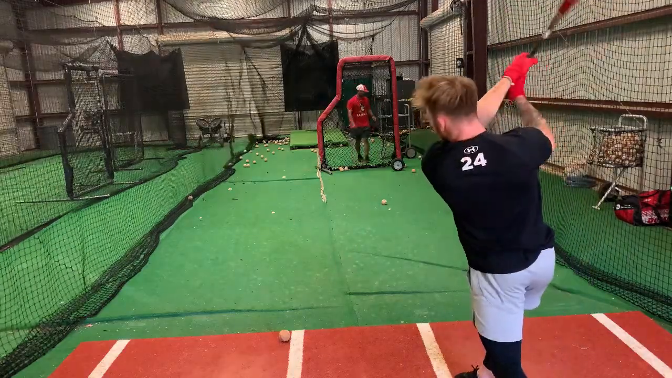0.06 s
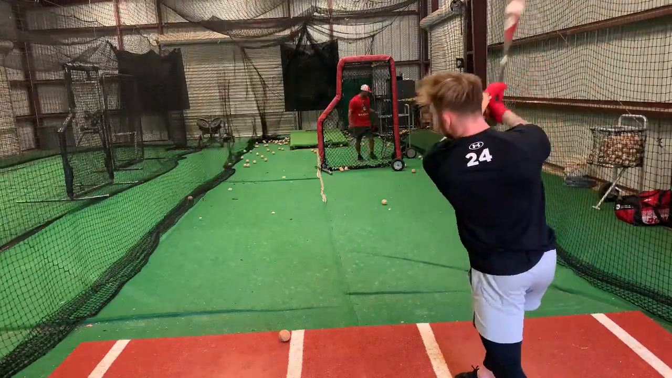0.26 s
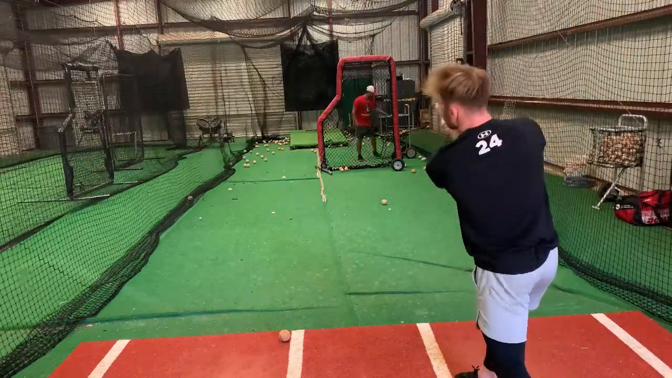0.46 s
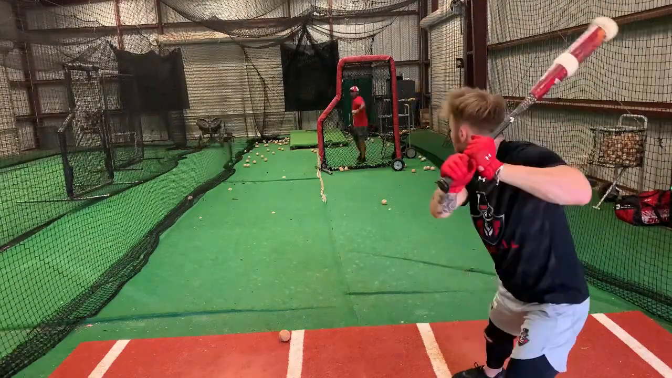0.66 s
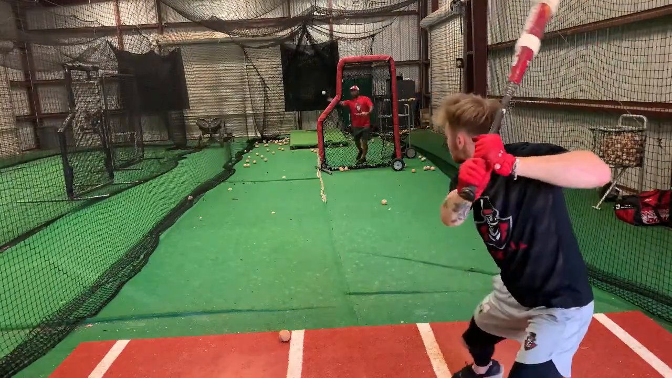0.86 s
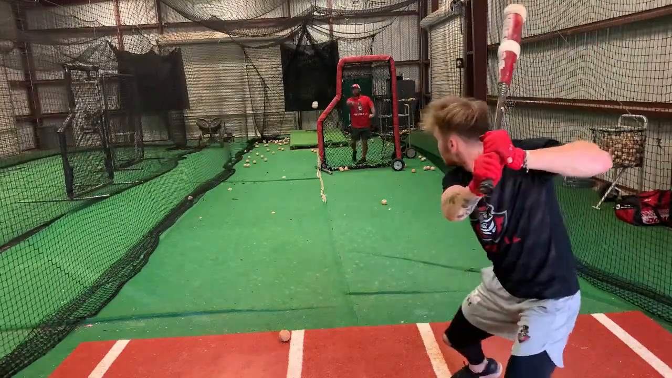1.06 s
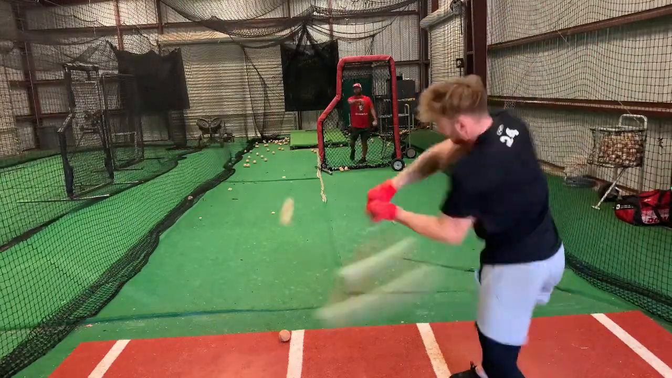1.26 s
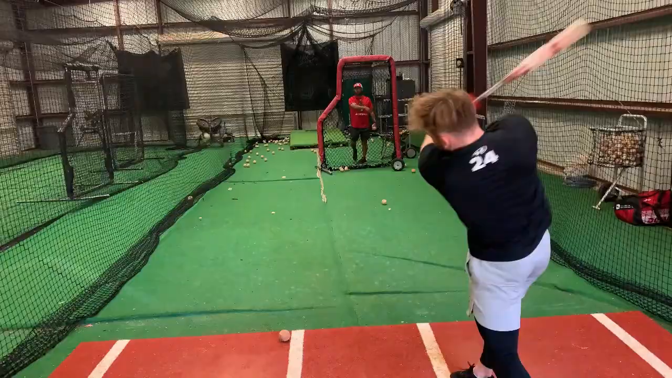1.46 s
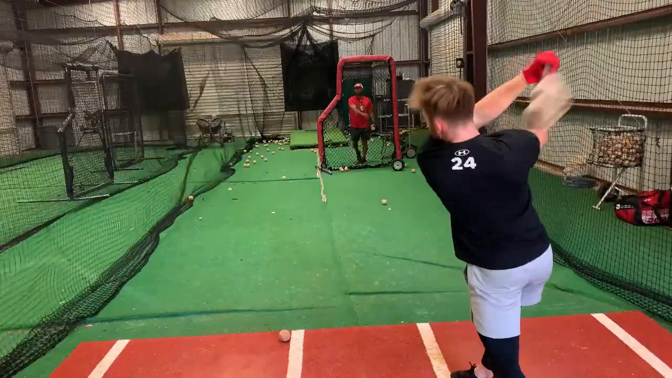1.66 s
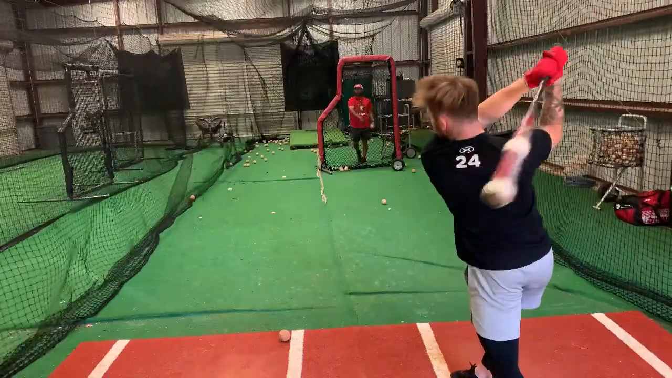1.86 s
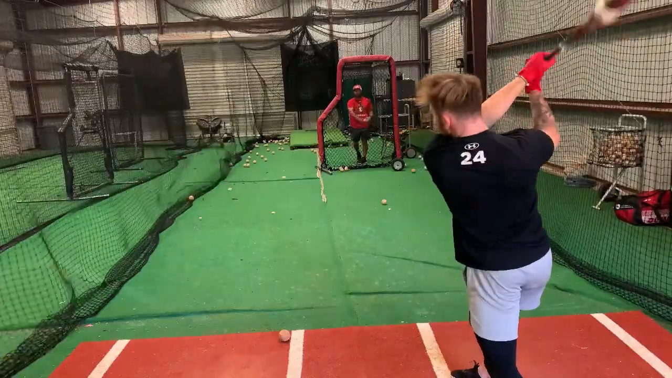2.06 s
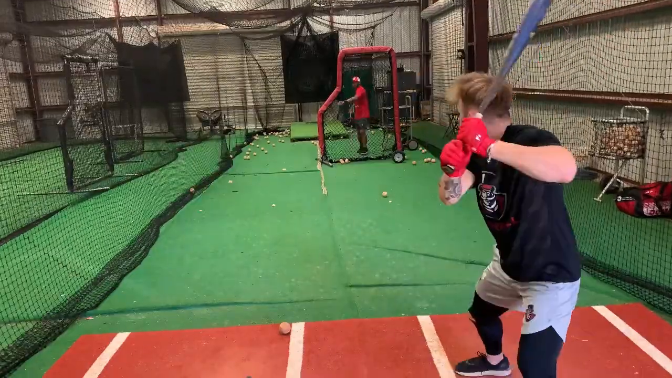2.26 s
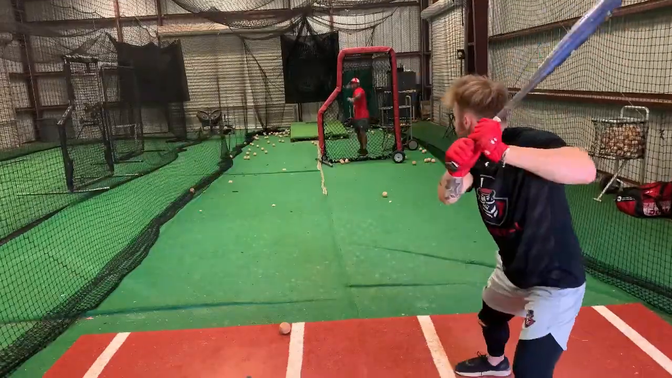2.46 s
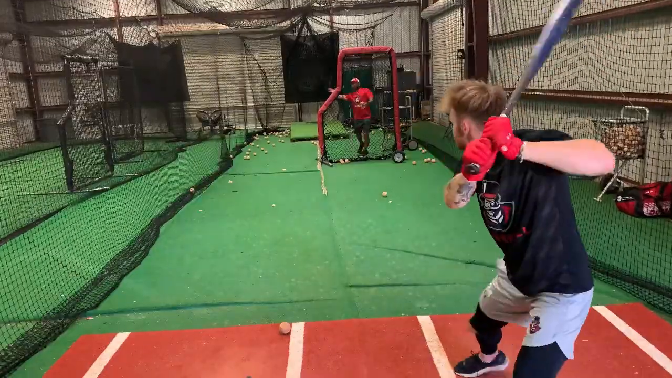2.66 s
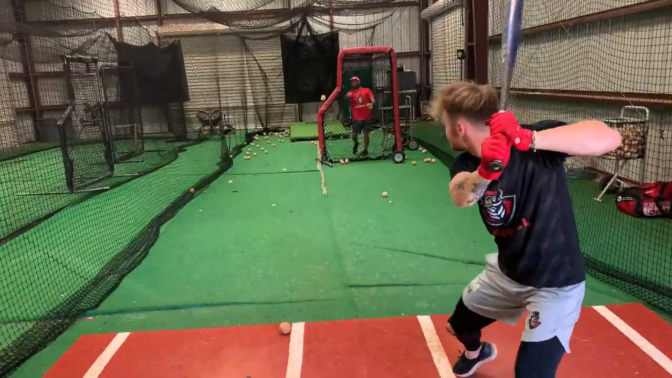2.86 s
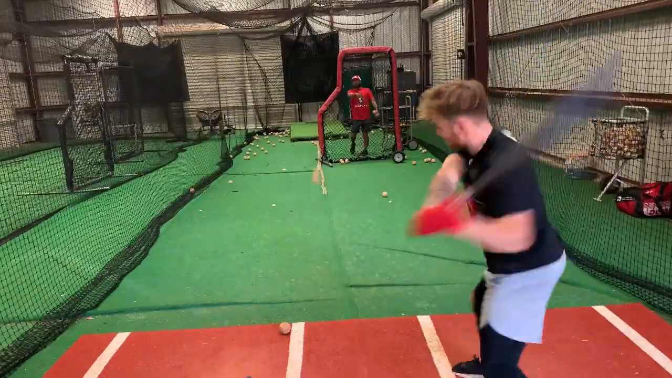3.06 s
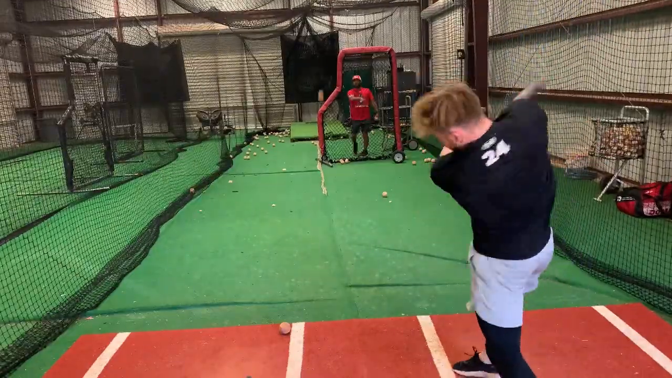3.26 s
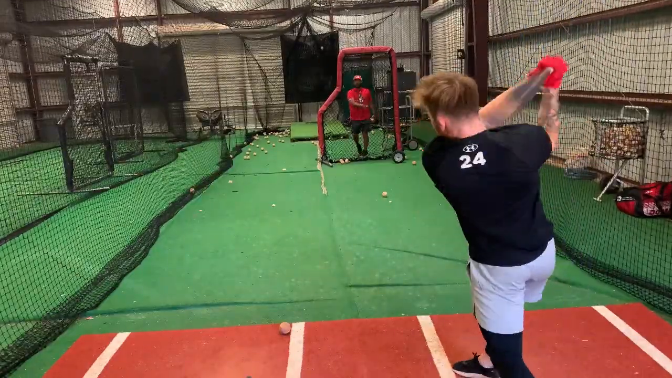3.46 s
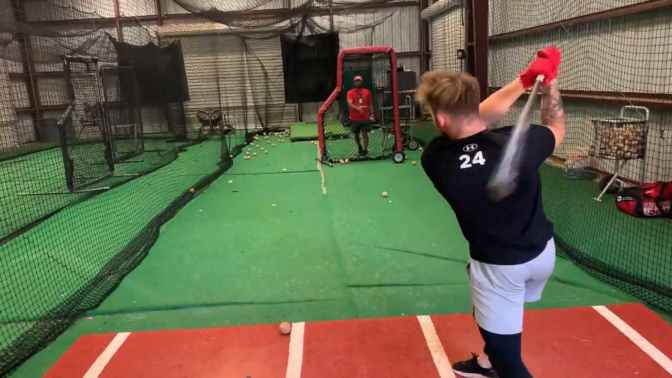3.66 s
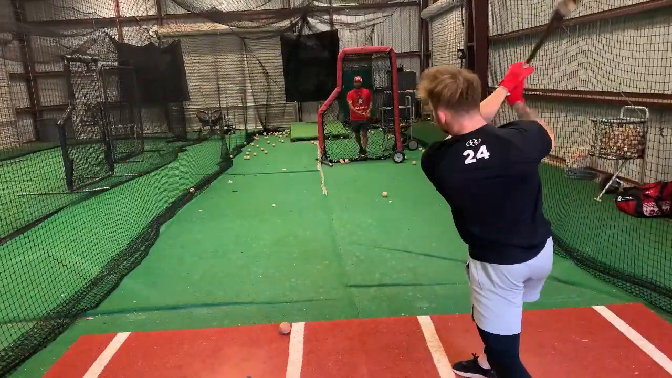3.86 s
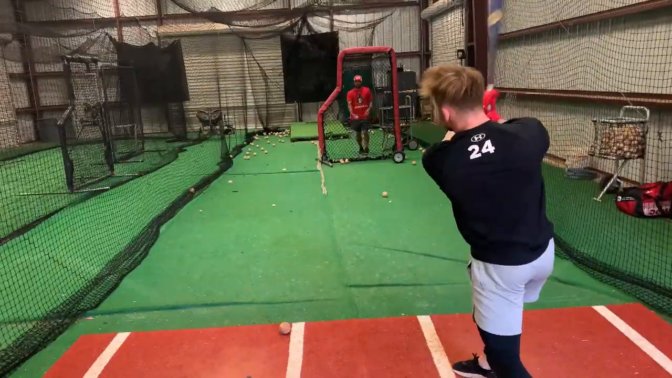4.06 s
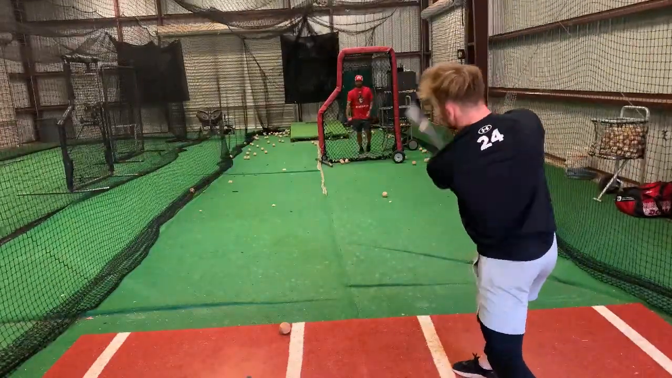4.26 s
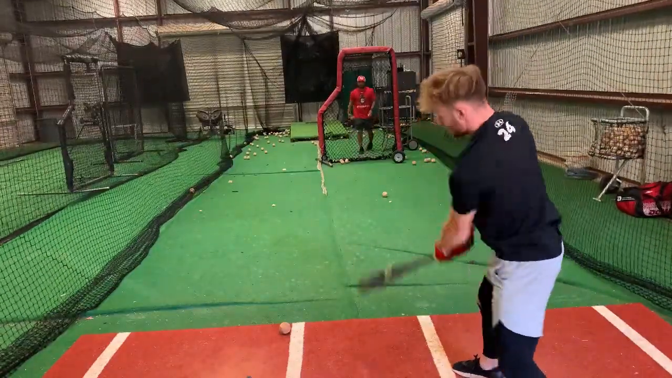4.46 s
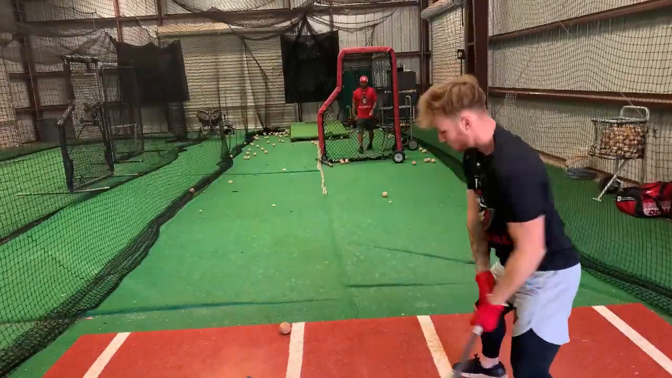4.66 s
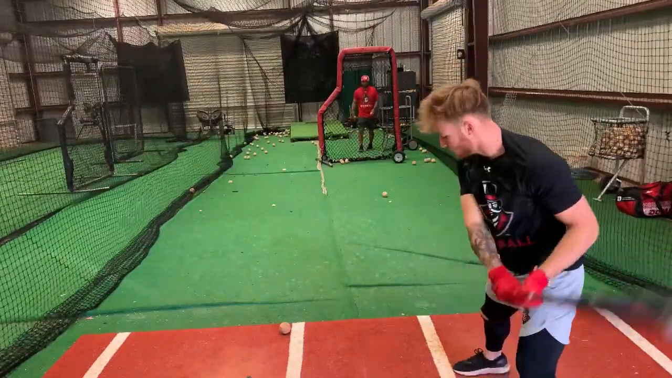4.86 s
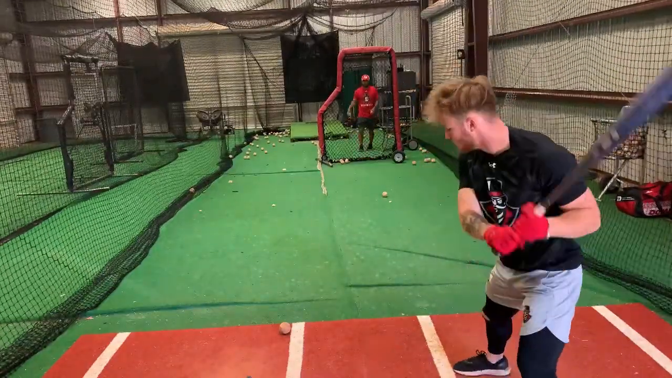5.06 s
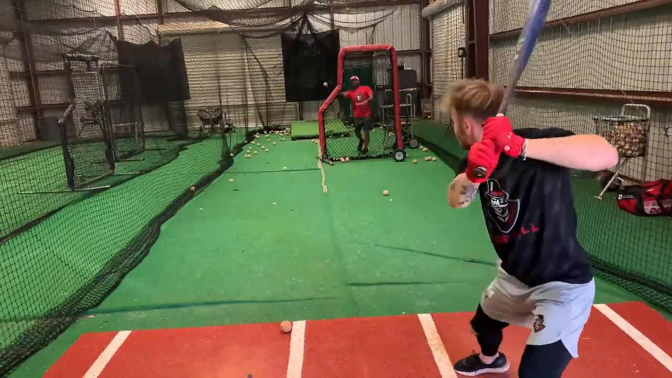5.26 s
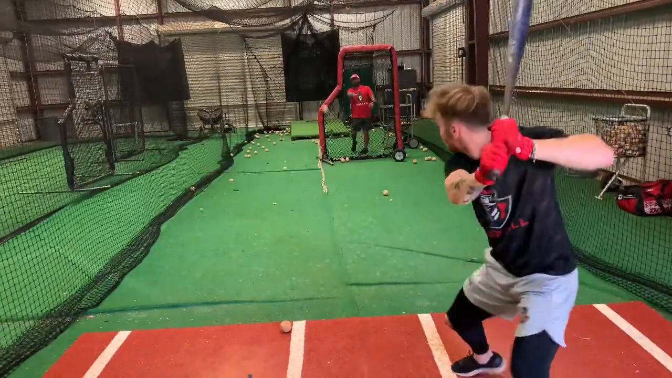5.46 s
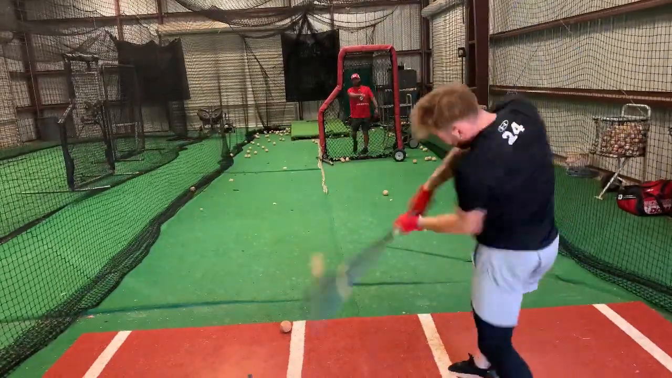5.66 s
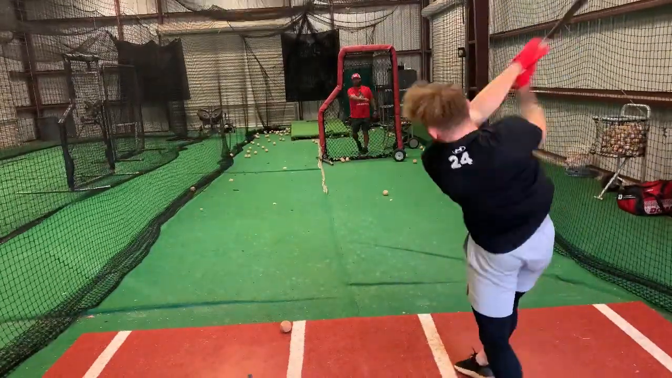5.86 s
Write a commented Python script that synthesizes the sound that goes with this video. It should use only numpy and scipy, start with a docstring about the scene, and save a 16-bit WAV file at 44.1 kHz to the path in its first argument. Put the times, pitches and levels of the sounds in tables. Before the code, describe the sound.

A low rumble fills a large sheet-metal hall, with a few soft ball taps and dull thuds on turf in the first second. At 1.3 s a wooden bat whooshes and hits a ball with a loud, sharp crack, close to the microphone and slightly overloaded. The hall rings for about a second, and the ball softly rattles the netting at 1.5 s. After two light thuds near 2.1 s the rumble drops quieter.

At 3.15 s a hollow metal bat swishes and strikes with a short, bright ping and the same echo. The ball lands in the net around 3.6 s with a soft rattle and thud as the rumble swells. Faint taps follow, then a dull thump near 4.6 s. Another loud metal ping comes at 5.65 s and rings into the hall. The background briefly cuts and returns at about 0.5, 2.2 and 5.2 s.

```python
"""Batting practice in a large sheet-metal hall, stereo microphone near the batter. Balls rattle the netting
and tap on the turf over a low rumble. At 1.3 s a padded wooden bat whooshes into a ball; at 3.15 s and
5.65 s a hollow metal bat does. Each hit overloads the recorder, whose gain control ducks, then recovers
while the hall rings for a second and the first two balls land. A splice before each swing cuts the hall
off and fades back in."""
import sys
import numpy as np
from scipy import signal
from scipy.fft import rfft, irfft
from scipy.io import wavfile

SR = 44100
rng = np.random.default_rng(int(sys.argv[2]) if len(sys.argv) > 2 else 0)


def master(y):
    """Save y as 16-bit WAV."""
    cut = np.clip(np.atleast_2d(y).T, -1, 1)
    pcm = np.round(cut * 32767)  # scale
    wavfile.write(sys.argv[1], SR, pcm.astype(np.int16))


N = 260631
SECONDS = np.arange(N) / SR

# the four spliced stretches: (start time [s])
STRETCH_STARTS = [0, .5415, 2.187, 5.155]
# swings of the bat: (contact time [s], level [dB])
SWING_CONTACTS = [(1.3, -14), (3.148, -23), (5.655, -25.5)]


def wooden_bat():
    """A padded wooden bat touches the ball, then drives it 4 ms later; its modes die fast."""
    # touch and main blow: (time [s], ring [dB], crack [dB], thump [dB], hall send [dB], hall crack [dB])
    hits = [(1.295, -5.5, -27.5, -36, -25.5, -21.5), (1.2993, -3, -1.5, 3, -15, 9)]
    # modes of the wood: (frequency [Hz], t60 [s], at touch [dB], at main blow [dB], toward hall [dB])
    modes = [(909, 0.033, -32.5, -3, 6), (1677, 0.018, -17, 4, 4), (2000, 0.029, -4, 0, 12),
             (2480, 0.016, 7, 1, -6.5), (2792, 0.023, 5.5, -9.5, 2), (3230, 0.032, -9.5, -18, -6),
             (4707, 0.0067, -20, -0.5, 1.5), (6800, 0.035, -36, -37.5, -28)]
    return bat_blows(hits, modes, thump_hz=320, hall_t60_share=.3)


def metal_bat():
    """A hollow metal bat pings on two hits; the ball thumps higher on the stiffer barrel."""
    # hits: (time [s], ring [dB], crack [dB], thump [dB], hall send [dB], hall crack [dB])
    hits = [(3.1475, 3, 1.5, -10.5, -9.5, 6), (5.6535, 8, 9, -13.5, -10, 7.5)]
    # barrel modes: (frequency [Hz], t60 [s], first hit [dB], second hit [dB], toward hall [dB])
    modes = [(1155, 0.024, -24, -9, -22), (1447, 0.013, 1, -4, -22), (2406, 0.047, 2.5, 0, -5),
             (2550, 0.074, -11, -17.5, -6.5), (2632, .1, -8.5, -11, -7), (2826, 0.08, -17, -20, -7),
             (2885, .08, -14, -14.5, -8), (3550, 0.052, -10.5, -22.5, -16), (3612, 0.081, -10, -18, -16),
             (3930, 0.03, -16.5, -13.5, -4), (4940, 0.036, -24.5, -15, -30), (5210, 0.06, -24, -17, -17),
             (5950, 0.038, -26, -25, -28.5), (6880, 0.034, -5.5, -18, -31.5)]
    return bat_blows(hits, modes, thump_hz=430, hall_t60_share=.65)


def bat_blows(hits, modes, thump_hz, hall_t60_share):
    """Each blow cracks, rings the bat and thumps the ball: near for the microphone, far for the hall."""
    near, far = np.zeros(N), np.zeros(N)
    t = np.arange(8192) / SR
    click = (t == 0) + 1e-18
    for k, (s, ring_db, crack_db, thump_db, hall_db, hall_crack_db) in enumerate(hits):
        burst = 0.16 * rng.standard_normal(len(t)) * np.exp(-t / 0.0013)
        add(near, from_db(crack_db + 9) * band(click + burst, 600, 24000), s)
        add(far, from_db(hall_crack_db) * band(click, 920, 13000), s)
        thump = -from_db(thump_db) * ring(thump_hz, t60=.024)
        add(near, thump, s + .0016)  # the squashed ball springs back a moment later
        add(far, from_db(hall_db - 14.5) * thump, s)
        for hz, t60, *levels_db, radiated_db in modes:
            mode = ring(hz, t60) * onset(t, 0.0013)
            add(near, from_db(ring_db + levels_db[k]) * mode, s)
            # the bat sweeps on while it rings, which widens each mode as the hall hears it
            widened = ring(hz, t60 * hall_t60_share) * onset(t, 0.0022)
            add(far, from_db(hall_db + radiated_db) * widened, s)
    return near, far


def whooshes():
    """Air rushing round the bat gets louder and brighter up to contact."""
    # course of every swing: (time before contact [s], relative level [dB], centre [Hz])
    course = [(0.23, -70, 980), (0.18, -48.5, 2000), (.07, -46, 1400), (0.025, -31, 2500),
              (0.0015, -0.5, 2800)]
    before, course_db, centre_hz = np.transpose(course)
    out = np.zeros((2, N))
    for contact, level_db in SWING_CONTACTS:
        span = slice(round((contact - before[0]) * SR), round(contact * SR))
        t = SECONDS[span] - contact
        swell_db = level_db + np.interp(t, -before, course_db)
        for hz in np.geomspace(500, 15000, 12):
            octaves_off = np.abs(np.log2(hz / np.interp(t, -before, centre_hz)))
            rush = noise_between((2, len(t)), hz / 1.6, hz * 1.17)
            out[:, span] += rush * from_db(swell_db - 5.8 * octaves_off ** 0.78)
    return out


def gusts():
    """The bat pushes a low gust ahead of it, which swells to contact and drops away."""
    rise_s, fall_s = .035, .02
    swell = np.zeros(N)
    for s, level_db in SWING_CONTACTS:
        swell += from_db(level_db - 13) * np.exp(np.minimum((SECONDS - s) / rise_s, (s - SECONDS) / fall_s))
    return swell * noise_between(N, 50, 140)


def landings():
    """Balls, gear and feet land softly, each a burst of noise; returns the near sound and the hall feed."""
    # balls shake the netting's cords and clips, and at 4.55 s a bat knocks the ground: (time [s], level [dB],
    # centre [Hz], decay [s])
    rattles = [(0.0, -42.5, 1920, 0.015), (1.509, -39.5, 9900, 0.062), (1.529, -33.5, 2000, 0.09),
               (1.946, -57, 6795, .045), (3.573, -42.5, 9000, 0.06), (3.679, -54, 1040, 0.065),
               (4.549, -46, 2170, 0.014)]
    # balls bounce and gear taps on the turf: (time [s], level [dB], centre [Hz])
    taps = [(.12, -53, 770), (.196, -52, 770), (.462, -48.5, 824), (.607, -62, 2000), (.925, -62, 1700),
            (1.14, -58, 2300), (3.04, -66, 1300), (3.996, -56, 898), (4.107, -59, 1570),
            (4.319, -57.5, 1460), (4.452, -58, 1400), (4.575, -54, 600), (5.22, -76, 3000),
            (5.45, -66, 1510)]
    # dull landings of balls and feet: (time [s], level [dB], centre [Hz], decay [s])
    thuds = [(.462, -41.5, 204, 0.042), (.918, -35, 124, 0.036), (1.507, -36, 196, 0.044),
             (2.076, -33.5, 127, 0.026), (2.17, -30.5, 298, 0.0051), (3.571, -42.5, 298, 0.11),
             (3.58, -36.5, 153, 0.12), (3.68, -37.5, 96.6, 0.11), (4.548, -31, 247.6, 0.02),
             (4.575, -25.5, 140, .066), (4.674, -40.5, 145, 0.042)]
    rattle_octaves, rattle_hall_db = 1.67, 5.5
    tap_decay_s, tap_octaves, tap_hall_db = .022, .7, -3
    thud_hall_db = -4.5
    near, far = np.zeros(N), np.zeros(N)
    t = np.arange(13000) / SR
    bright = [(*row, rattle_octaves, rattle_hall_db) for row in rattles]
    bright += [(*row, tap_decay_s, tap_octaves, tap_hall_db) for row in taps]
    for s, level_db, hz, decay_s, octaves, hall_db in bright:
        low, high = hz / 2 ** (octaves / 2), hz * 2 ** (octaves / 2)
        envelope = from_db(level_db) * np.exp(-t / decay_s) * onset(t, 0.001)
        burst = envelope * noise_between(len(t), low, high)
        add(near, burst, s)
        # the hall smears the burst, so one click of the same colour and energy drives it
        click = rms_one(band((t == 0) + 1e-18, low, high)) * np.sqrt(np.mean(burst ** 2))
        add(far, from_db(hall_db) * click, s)
    for s, level_db, hz, decay_s in thuds:
        envelope = from_db(level_db) * np.exp(-t / decay_s) * onset(t, 0.0014)
        thud = envelope * noise_between(len(t), hz / 1.6, hz * 1.44)
        add(near, thud, s)
        add(far, from_db(thud_hall_db) * thud, s)
    return near, far


def at_microphone(x):
    """Direct sound from a little right of centre, followed by duller first reflections."""
    # floor, walls and roof: (delay [s], level [dB], left minus right [dB])
    reflections = [(.003, -17, 2), (.013, -11, -8), (.018, -13.5, 1), (.023, -11.5, -5), (0.031, -15, 3.5)]
    # treble bends round the recorder's body and reaches the left port late
    shadow_hz, port_lag_s, pan_db = 5200, 2e-4, -2.5
    hz = np.arange(N // 2 + 1) * SR / N
    phase_lag = 2 * np.pi * np.clip(hz - shadow_hz, 0, None) * port_lag_s
    left = irfft(rfft(x) * np.exp(-1j * phase_lag), N)
    sides = np.array([[.5], [-.5]])
    out = np.array([left, x]) * from_db(pan_db * sides)
    dull = band(x, 400, 4700)
    for delay_s, level_db, side_db in reflections:
        out += np.roll(dull, round(delay_s * SR)) * from_db(level_db + side_db * sides)
    return out


def hall(x):
    """Dense reverberation all round the microphone, dying band by band; a splice ends it."""
    # ring time of the hall: (frequency [Hz], t60 [s])
    t60s = [(60, 0.3), (250, 1.04), (1000, 1.1), (2500, 1.07), (5000, .95), (7500, 0.67), (11000, 0.57),
            (16000, 0.29)]
    # colour of the tail: (frequency [Hz], level [dB])
    colour = [(60, 0), (250, 0.5), (500, 5.5), (1000, 5), (2500, 5.5), (5000, 1), (7500, -5.5),
              (11000, -8.5), (16000, -3)]
    wall_s, wall_width_s, wall_db = .27, 0.037, 0.5  # the far end wall sends back one slight swell
    t = np.arange(70000) / SR
    tail = sum(part * from_db(at_hz(colour, hz) - 60 * t / at_hz(t60s, hz))
               for hz, part in diffuse_bands(len(t)))
    tail *= onset(t, .015) / np.sqrt(.07 * SR)  # reflections build up
    tail *= from_db(wall_db * np.exp(-((t - wall_s) / wall_width_s) ** 2))
    out = np.zeros((2, N))
    cuts = [round(s * SR) for s in STRETCH_STARTS] + [N]
    for a, b in zip(cuts, cuts[1:]):
        out[:, a:b] = signal.fftconvolve(x[None, a:b], tail, axes=1)[:, :b - a]
    return out


def rumble():
    """Room tone of fans and the building, with a few narrow drones; booms swell it until a splice."""
    # spectrum of the room tone: (frequency [Hz], density [dB])
    colour = [(15, -46), (25, -21), (59, -2.5), (141, -7.5), (195, -15.5), (249, -19.5), (607, -28),
              (2350, -47), (2910, -48), (6740, -58.5), (8590, -66.5), (10400, -55.5), (16000, -69.5)]
    # wavering drones: (frequency [Hz], width [Hz], level against the rumble [dB])
    drones = [(73.52, 7.6, -9), (102.7, 8.1, -10), (140, 18, -12), (252, 7.9, -21)]
    # steady rumble in each stretch: (level [dB])
    steady_db = [-40, -41.5, -55, -53.5]
    # hard blows set the sheet walls booming: (time [s], level [dB])
    booms = [(-.2, -32), (3.15, -47), (3.6, -33.5), (4.57, -49), (5.655, -39)]
    boom_rise_s, boom_t60_s = .08, 2.9
    noise = rms_one(sum(from_db(at_hz(colour, hz)) * part for hz, part in diffuse_bands(N)))
    for hz, width_hz, level_db in drones:
        noise += from_db(level_db) * noise_between(N, hz - width_hz / 2, hz + width_hz / 2)
    stretch = np.searchsorted(STRETCH_STARTS, SECONDS, "right") - 1
    power = from_db(steady_db)[stretch] ** 2
    for s, level_db in booms:
        t = np.clip(SECONDS - s, 0, None)
        swell = from_db(level_db - 60 * t / boom_t60_s) * onset(t, boom_rise_s)
        same_stretch = stretch == stretch[max(round(s * SR), 0)]
        power += swell ** 2 * same_stretch
    return noise * np.sqrt(power)


def diffuse_bands(size):
    """The hall's diffuse field at the microphone: third-octave bands of stereo noise at flat density."""
    # likeness of left and right: (frequency [Hz], correlation [-1 to 1])
    likeness = [(60, 1), (250, .92), (600, 0.12), (1500, -0.49), (3000, -0.0072), (6000, -0.5),
                (12000, -0.45)]
    edges = 25 * 2 ** np.arange(0, 9.5, 1 / 3)
    white = rng.standard_normal((2, 2, size))
    for k, (low, high) in enumerate(zip(edges, edges[1:])):
        mid, side = band(white[k % 2], low, high)
        hz = np.sqrt(low * high)
        alike = at_hz(likeness, hz)
        yield hz, np.sqrt(1 + alike) * mid + np.sqrt(1 - alike) * side * [[1], [-1]]


def from_db(db):
    """Gain from decibels."""
    return 10 ** (np.asarray(db) / 20)


def rms_one(x):
    """Scale to unit rms."""
    return x / np.sqrt(np.mean(x ** 2) + 1e-20)


def at_hz(points, hz):
    """Read a table on a log-frequency axis."""
    frequencies, values = np.transpose(points)
    return np.interp(np.log(hz), np.log(frequencies), values)


def band(x, low_hz, high_hz):
    """Causal band-pass."""
    sos = signal.butter(2, [low_hz, min(high_hz, .45 * SR)], "band", fs=SR, output="sos")
    return signal.sosfilt(sos, x)


def noise_between(shape, low_hz, high_hz):
    """A band of noise at unit rms."""
    return rms_one(band(rng.standard_normal(shape), low_hz, high_hz))


def onset(t, rise_s):
    """Exponential rise from 0 to 1."""
    return 1 - np.exp(-t / rise_s)


def ring(hz, t60):
    """A struck mode of height 1."""
    t = np.arange(8192) / SR
    return np.sin(2 * np.pi * hz * t) * from_db(-60 * t / t60)


def add(out, x, s):
    """Mix x into out from time s."""
    at = round(s * SR)
    out[at:at + len(x)] += x[:N - at]


def scene():
    """Bats, swings and landings up close, the hall and its rumble behind them."""
    metal, metal_far = metal_bat()
    wood, wood_far = wooden_bat()
    knocks, knocks_far = landings()
    far = from_db(14) * (metal_far + wood_far) + knocks_far
    return at_microphone(metal + wood) + knocks + hall(far) + whooshes() + gusts() + rumble()


def record(dry):
    """Low cut, treble dips, gain control that ducks and recovers steadily, overload, splices, top cut."""
    # narrow hollows in the treble: (frequency [Hz], width [Hz], depth [share])
    dips = [(8700, 2000, .9), (8700, 1400, .8), (13300, 2200, .9)]
    low_cut_hz, top_cut_hz = 48.6, 16200
    threshold_db, max_duck_db, release_db_per_s, attack_s = -16.5, 18, 39.5, 0.03
    fade_out_s, fade_in_s = .0015, 0.042
    x = signal.sosfilt(signal.butter(2, low_cut_hz, "high", fs=SR, output="sos"), dry)
    for hz, width_hz, depth in dips:
        x = x - depth * signal.lfilter(*signal.iirpeak(hz, hz / width_hz, SR), x)
    power = signal.lfilter([.002], [1, -.998], np.mean(x ** 2, axis=0))
    over_db = np.clip(10 * np.log10(power + 1e-20) - threshold_db, 0, max_duck_db)
    release_db = release_db_per_s * SECONDS
    held_db = np.maximum.accumulate(over_db + release_db) - release_db
    pole = np.exp(-1 / (attack_s * SR))
    duck_db = signal.lfilter([1 - pole], [1, -pole], held_db)
    x = x * from_db(-duck_db)
    x = .94 * x / (1 + np.abs(x) ** 6) ** (1 / 6)  # overload rounds off the peaks
    for s in STRETCH_STARTS[1:]:
        x = x * np.clip(np.maximum((s - SECONDS) / fade_out_s, (SECONDS - s) / fade_in_s), 0, 1)
    top_cut = signal.cheby2(12, 60, top_cut_hz, fs=SR, output="sos")
    return np.clip(signal.sosfilt(top_cut, x), -1, 1)


dry = scene()
out = record(dry)
master(out)
```